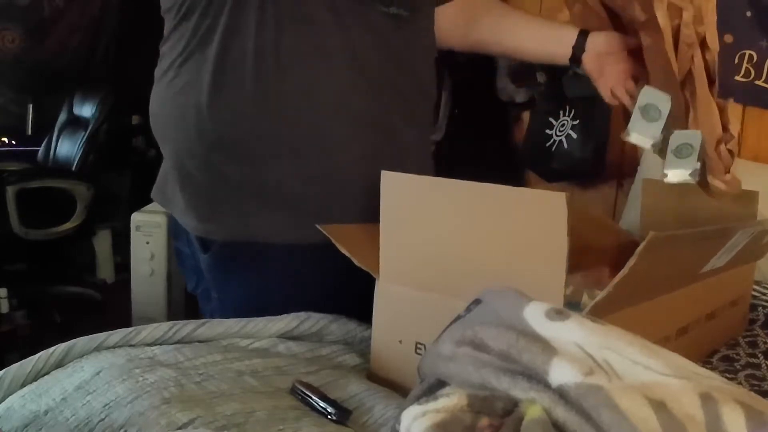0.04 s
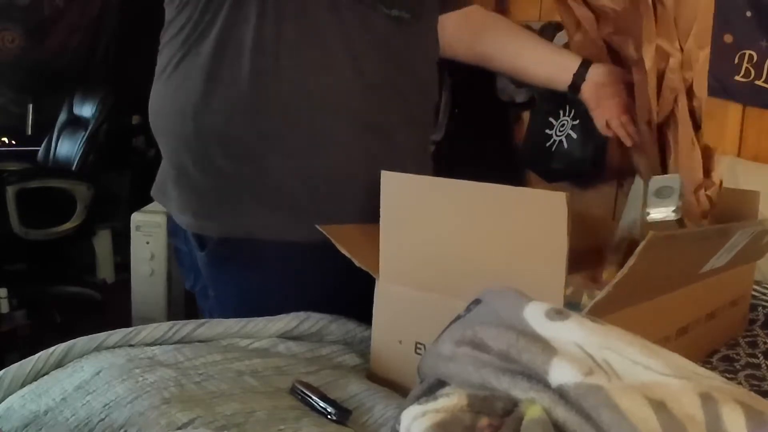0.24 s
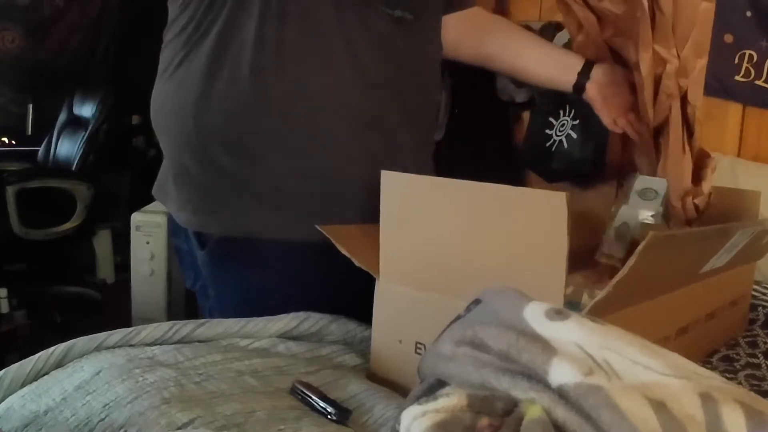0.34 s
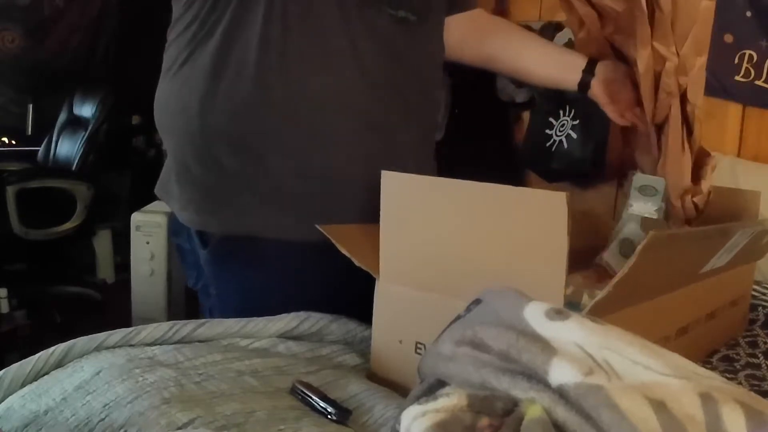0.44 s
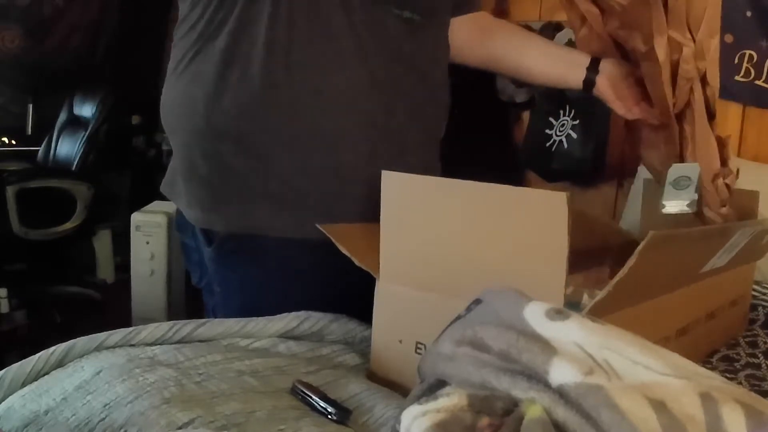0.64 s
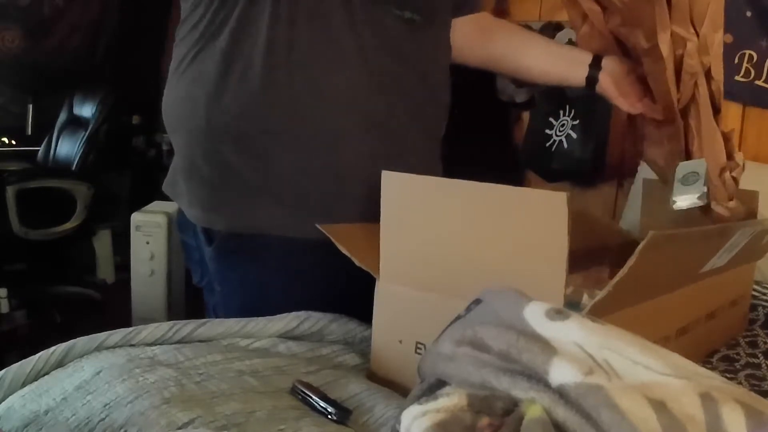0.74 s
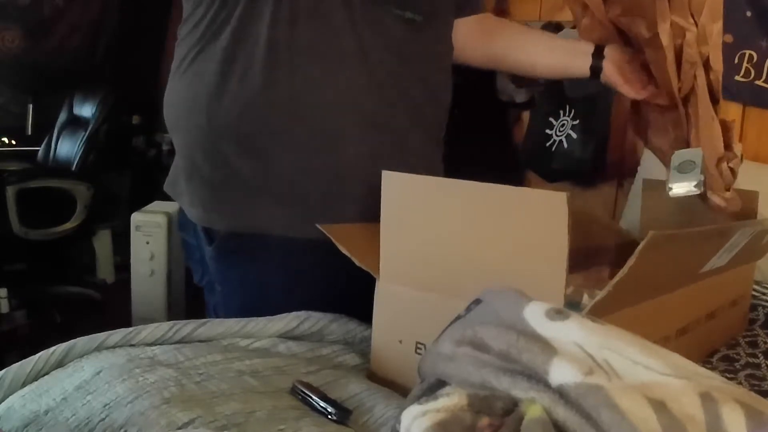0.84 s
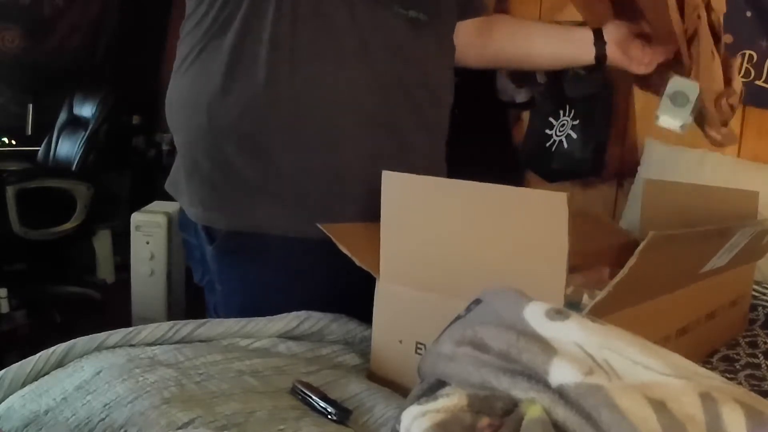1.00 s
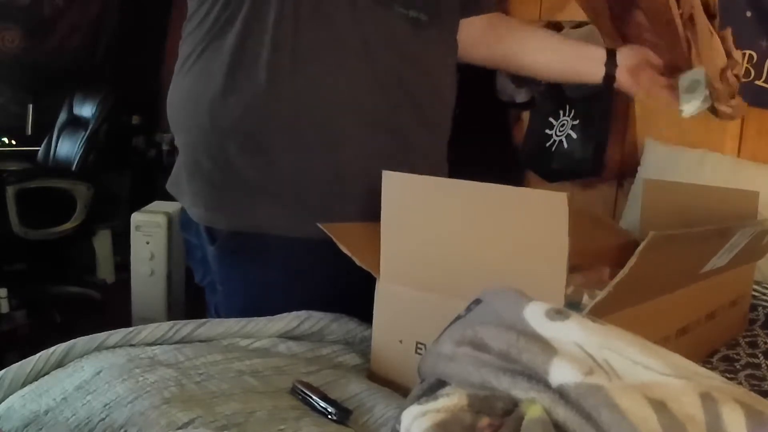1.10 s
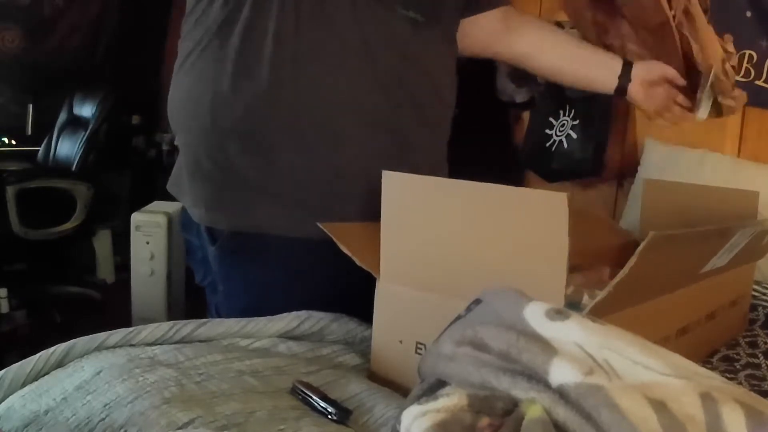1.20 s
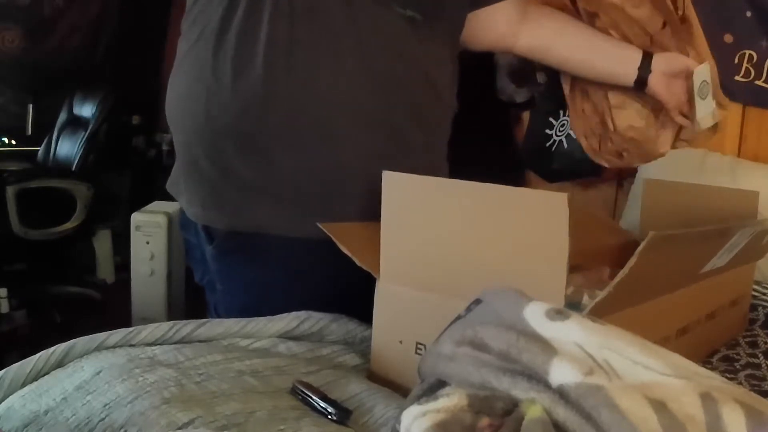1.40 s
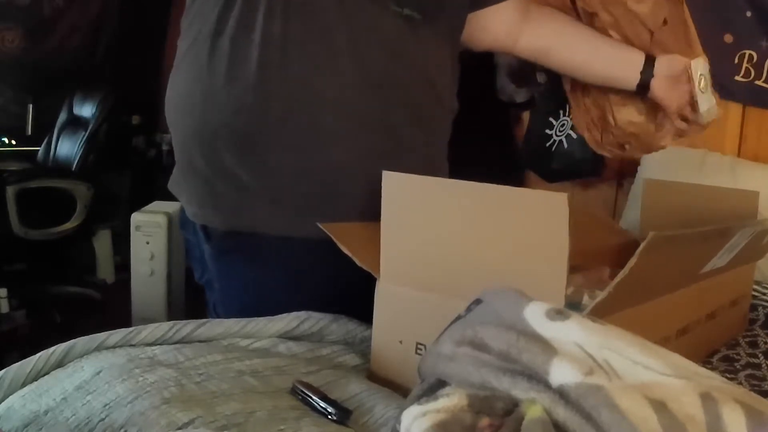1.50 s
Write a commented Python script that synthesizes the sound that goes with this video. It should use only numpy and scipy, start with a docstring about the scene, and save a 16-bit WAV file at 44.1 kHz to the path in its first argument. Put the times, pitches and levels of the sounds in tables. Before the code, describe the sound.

Packing paper rustles softly as it is pulled from a cardboard box. A light clink comes at 0.1 seconds, then small packets drop into the box with hollow knocks and clinks from 0.2 to 0.7 seconds, loudest at 0.2 and 0.65. From about 0.9 to 1.5 seconds the paper slides on with a faint hiss and scattered crackles, over a low hum in a small room.

```python
"""A soft rustle comes first: brown packing paper is lifted out of a cardboard box in a small
furnished room. Something hard clinks in small packets, which slip out and knock into the box,
each impact exciting its damped modes. Then the paper slides on over a low hum, hissing by
friction and crackling as its creases buckle."""
import sys
import numpy as np
from scipy import signal
from scipy.fft import rfft, irfft, next_fast_len
from scipy.io import wavfile

SR = 44100
rng = np.random.default_rng(int(sys.argv[2]) if len(sys.argv) > 2 else 0)


def generate_wav(sig):
    """Save sig (samples, or channels by samples) to the path in sys.argv[1] as 16-bit PCM at SR."""
    pcm = np.round(np.clip(np.atleast_2d(sig).T, -1, 1) * 32767).astype(np.int16)
    wavfile.write(sys.argv[1], SR, pcm)


N = 68355
TIME_S = np.arange(N) / SR


def from_db(db):
    """Decibels to amplitude ratio."""
    return 10 ** (np.asarray(db) / 20)


def unit_power(x):
    """Normalisation to a mean square of one."""
    return x / np.sqrt(np.mean(x ** 2) + 1e-20)


def envelope(rows):
    """Gain interpolated in decibels between rows of time_s, level_db."""
    return from_db(np.interp(TIME_S, *np.transpose(rows)))


def decay(t60_s):
    """Exponential damping: 60 dB down after t60_s."""
    return np.exp(-np.log(1000) * TIME_S / t60_s)


def delayed(x, delay_s):
    """A pure time delay."""
    return np.concatenate([np.zeros(int(delay_s * SR)), x])[:N]


def butterworth(x, hz, kind, order=2):
    """A filter with a maximally flat passband."""
    return signal.sosfilt(signal.butter(order, hz, kind, fs=SR, output="sos"), x + 1e-18)


def band_around(x, centre_hz, octaves):
    """A band-pass about a geometric centre, at unit power."""
    half = 2 ** (octaves / 2)
    return unit_power(butterworth(x, [centre_hz / half, min(centre_hz * half, SR / 2 - 1)], "band"))


def at_hz(rows, hz, column=1):
    """Interpolation of a table on a log-frequency axis."""
    rows = np.array(rows)
    return np.interp(np.log(hz + 1e-9), np.log(rows[:, 0]), rows[:, column])


def coloured(x, spectrum):
    """Spectral shaping, at unit power."""
    size = next_fast_len(N)
    hz = np.arange(size // 2 + 1) * SR / size
    return unit_power(irfft(rfft(x, size) * from_db(at_hz(spectrum, hz)), size)[:N])


def stick_slip(slips_per_s=5000, spread_db=3, flutter_db=1.2, clumps_per_s=120):
    """Stick-slip friction: paper on paper gives tiny impulses, uneven in size and in clumps."""
    slipping = rng.random(N) < slips_per_s / SR
    sizes = from_db(spread_db * np.minimum(rng.exponential(1, N), 5)) * rng.choice([-1, 1], N)
    clumps = np.interp(TIME_S * clumps_per_s, np.arange(N), rng.standard_normal(N))
    return slipping * sizes * from_db(flutter_db * clumps)


# Envelopes of the paper's rustle and treble hiss: time_s, level_db
RUSTLE_LEVELS = [(0, -59), (0.05, -68.5), (0.35, -66), (0.43, -73), (0.455, -60), (0.51, -68.5),
                 (0.82, -79), (0.90, -62.5), (0.97, -62.5), (1.02, -66), (1.125, -58.5), (1.185, -71.5),
                 (1.25, -66), (1.30, -57.5), (1.36, -58), (1.42, -64), (1.465, -61), (1.55, -69.5)]
HISS_LEVELS = [(0, -80), (0.84, -81), (1.06, -77.5), (1.128, -64), (1.175, -82), (1.25, -78.5),
               (1.31, -73.5), (1.39, -83), (1.46, -74), (1.55, -77.5)]
# Their spectra: frequency_hz, relative_density_db
RUSTLE_SPECTRUM = [(150, 2.5), (900, 4.5), (1800, 2), (3300, -3), (5000, -13.5), (7500, -26), (15000, -31)]
HISS_SPECTRUM = [(3500, 1.5), (11500, 1), (14000, -3), (16000, -20)]

def sliding_paper():
    """Friction noise: the sheet radiates its many slips as a rustle and a hiss."""
    slips = stick_slip()
    rustle = envelope(RUSTLE_LEVELS) * coloured(slips, RUSTLE_SPECTRUM)
    smoother_slips = slips + np.std(slips) * rng.standard_normal(N)
    return rustle + envelope(HISS_LEVELS) * coloured(smoother_slips, HISS_SPECTRUM)


# Room noise: frequency_hz, relative_density_db
NOISE_SPECTRUM = [(20, 1), (45, -1), (75, -4.5), (300, -24.5), (900, -30), (2500, -41), (6000, -48.5),
                  (15000, -47)]

def background(noise_db=-61.5, hum_db=-67, hum_hz=116.6):
    """Stationary sound: broadband room noise and a pure tone of mains hum."""
    noise = from_db(noise_db) * coloured(rng.standard_normal(N), NOISE_SPECTRUM)
    return noise + from_db(hum_db) * np.sqrt(2) * np.sin(2 * np.pi * hum_hz * TIME_S)


def ring(modes, scatter_db):
    """Modal superposition: a blow excites damped sinusoids, each with a chance strength."""
    out = 0
    for k, (hz, db, t60_s) in enumerate(modes):
        amplitude = (-1) ** k * from_db(db + scatter_db * rng.normal())
        out += amplitude * np.sin(2 * np.pi * hz * TIME_S) * decay(t60_s)
    return out


# Hard pieces clink, and tick as a packet settles: start_s, level_db
CLINKS = [(0.1202, -42.5), (0.1740, -63.5), (0.2150, -50.5), (0.3755, -49.5), (0.6510, -48),
          (0.6900, -59.5), (0.7090, -66.5)]
TICKS = [(0.2465, -51.5), (0.5620, -62.5), (0.6780, -54.5)]
# Their modes: pitch_hz, level_db, t60_s
CLINK_MODES = [(1484, -9, 0.074), (2455, -6.5, 0.068), (2754, -4.5, 0.15), (3640, -7.5, 0.1),
               (3715, -8.5, 0.058), (10300, -27, 0.05)]
TICK_MODES = [(3960, -2.5, 0.094), (4700, -19, 0.044), (5320, -3, 0.036), (6190, -2.5, 0.028)]
# Their scratchy contact: frequency_hz, relative_density_db
CONTACT_SPECTRUM = [(800, 1.5), (1500, 0), (3500, 8.5), (6500, -17), (10300, -8), (15000, -38)]

def hard_pieces(contact_db=-7.5):
    """Hard impact: brief contact noise accompanies the free vibration of high modes."""
    out = 0
    for hits, modes in ((CLINKS, CLINK_MODES), (TICKS, TICK_MODES)):
        for start_s, level_db in hits:
            tone = ring(modes, scatter_db=0.67)
            contact = decay(t60_s=0.07) * coloured(rng.standard_normal(N), CONTACT_SPECTRUM)
            out += delayed(from_db(level_db) * (tone + from_db(contact_db) * contact), start_s)
    return out


# Slap of cardboard: frequency_hz, relative_density_db, t60_s
SLAP_BANDS = [(60, -18, 0.14), (192, -13.5, 0.27), (520, 10.5, 0.15), (1040, 2, 0.063), (1490, -2, 0.13),
              (2840, -10.5, 0.19), (6500, -27.5, 0.17), (10900, -21.5, 0.14), (16000, -31, 0.055)]

def cardboard_slap(crack_db=-1.5):
    """Frequency-dependent damping: after a crack, each band of dense modes dies at its own rate."""
    edges_hz = np.geomspace(45, 17000, 15)
    white = rng.standard_normal((2, N))
    steady = damped = 0
    for k, (low, high) in enumerate(zip(edges_hz, edges_hz[1:])):
        centre_hz = np.sqrt(low * high)
        band = from_db(at_hz(SLAP_BANDS, centre_hz)) * butterworth(white[k % 2], [low, high], "band")
        steady += band
        damped += band * decay(at_hz(SLAP_BANDS, centre_hz, column=2))
    crack = (1 + from_db(crack_db) * decay(t60_s=0.039)) / 2
    return damped / np.std(steady) * crack


# Packets hit the box: start_s, pitch_hz, thump_db, overtone_db, ring_db, slap_db, dull_hz, node_hz
IMPACTS = [(0.2125, 119.5, -17, -30, -32, -26.5, 2400, 1400),
           (0.22, 248, -26, -35, -36.5, -37.5, 1700, 1260), (0.2399, 138, -29.5, -33, -47, -39, 9100, 330),
           (0.2984, 349, -36.5, -51, -57, -40.5, 900, 1280),
           (0.3739, 244, -34.5, -35, -42.5, -34.5, 2940, 692),
           (0.5318, 180.5, -27.5, -32.5, -37, -32, 980, 798),
           (0.5611, 237, -39.5, -49, -58, -43, 2010, 884), (0.6500, 254.5, -20, -24, -36, -30.5, 3620, 547),
           (0.6744, 338, -42, -44, -51, -54, 4000, 643), (0.702, 215, -40.5, -48, -55, -64, 1000, 908)]
# Modes of the box: pitch_hz, level_db, t60_s
BOX_MODES = [(131.4, -8.5, 0.14), (210.4, -6.5, 0.15), (242.1, 4, 0.11), (310.7, -6.5, 0.074),
             (385.7, -0.5, 0.11), (538, -7.5, 0.11), (621, -16.5, 0.2), (866, -14, 0.17), (919, -4, 0.084),
             (1038, -5, 0.065), (1401, -10.5, 0.11)]

def packet_knocks(push_s=0.0047, contact_s=0.0018, overtone_ratio=1.54, radiation_hz=47):
    """Impact excitation: a packet flexes a wall in two modes, rings the box and slaps the cardboard."""
    push = (TIME_S / push_s * np.exp((1 - (TIME_S / push_s) ** 2) / 2)) ** 0.41  # peaks at push_s
    flex = push + from_db(-29.5) * decay(t60_s=0.29)  # the wall rings on faintly
    onset = 1 - np.exp(-TIME_S / contact_s)
    out = 0
    for start_s, pitch_hz, thump_db, overtone_db, ring_db, slap_db, dull_hz, node_hz in IMPACTS:
        phase = 2 * np.pi * pitch_hz * TIME_S
        wall = -from_db(thump_db) * np.sin(phase) - from_db(overtone_db) * np.sin(overtone_ratio * phase)
        body = wall * flex + from_db(ring_db) * ring(BOX_MODES, scatter_db=3.5)
        slap = from_db(slap_db) * butterworth(cardboard_slap(), dull_hz, "low", order=1)
        # The point of impact lies on a node of one band, which stays weak.
        notch = signal.iirnotch(node_hz, Q=3.66, fs=SR)
        out += delayed(signal.lfilter(*notch, body * onset + slap), start_s)
    return butterworth(out, radiation_hz, "high")  # the box radiates little deep bass


# Patches of paper crumple: start_s, length_s, level_db, centre_hz, width_octaves
CRUMPLES = [(0.214, 0.039, -59.5, 3430, 1.4), (0.959, 0.022, -57, 1250, 1.4),
            (1.093, 0.05, -63, 3190, 0.17), (1.447, 0.025, -58.5, 2820, 1.1)]

def crumples():
    """Cascaded buckling: a run of tiny creases swells and dies, ringing in one band of the sheet."""
    out = 0
    for start_s, length_s, level_db, centre_hz, width_octaves in CRUMPLES:
        swell = np.sqrt(np.abs(np.sin(np.pi * np.minimum(TIME_S / length_s, 1))))
        crackle = band_around(stick_slip(), centre_hz, width_octaves)
        out += delayed(from_db(level_db) * swell * crackle, start_s)
    return out


# Creases snap: start_s, level_db, centre_hz
SNAPS = [(0.227, -55, 7900), (0.3155, -62.5, 8000), (0.4407, -57.5, 3060), (0.4836, -59.5, 3730),
         (0.9273, -60, 3600), (0.9342, -49, 2640), (0.9610, -52.5, 1410), (1.0540, -59, 9600),
         (1.2101, -54.5, 2470), (1.441, -52.5, 2600), (1.4561, -50.5, 3200)]
# Spectrum of a crease: frequency_hz, relative_density_db
CREASE_SPECTRUM = [(300, -32), (1000, 6.5), (2300, 1.5), (4200, -4), (6500, -14.5), (11000, -11.5),
                   (16000, -37)]

def crease_snaps():
    """Snap-through buckling: a crease gives way in a short burst, higher for a smaller fold."""
    out = 0
    for start_s, level_db, centre_hz in SNAPS:
        noise = coloured(rng.standard_normal(N), CREASE_SPECTRUM)
        burst = band_around(noise, centre_hz, octaves=2.1) * decay(t60_s=0.042)
        out += delayed(from_db(level_db) * burst, start_s)
    return out


# Reflections from near surfaces: delay_s, level_db
REFLECTIONS = [(.0068, -20), (0.029, -22.5)]

def room(x, tail_db=-19, dull_hz=6300):
    """Reverberation: early reflections precede and overlap a short, dull, diffuse tail."""
    early = sum(from_db(level_db) * delayed(x, delay_s) for delay_s, level_db in REFLECTIONS)
    diffuse = butterworth(rng.standard_normal(N), dull_hz, "low", order=1)
    tail = delayed(diffuse * decay(t60_s=0.15), delay_s=0.011)
    late = signal.fftconvolve(x, tail / np.linalg.norm(tail))[:N]
    return x + early + from_db(tail_db) * late


def scene():
    """Superposition: box, packets and paper sound in the room over its background, in mono."""
    sources = packet_knocks() + hard_pieces() + sliding_paper() + crease_snaps() + crumples()
    return (room(sources) + background())[None]


def record(dry, cutoff_hz=15700):
    """Band limiting: an elliptic low-pass cuts the top steeply."""
    return signal.sosfilt(signal.ellip(10, .1, 80, cutoff_hz, fs=SR, output="sos"), dry)


dry = scene()
out = record(dry)
generate_wav(out)
```